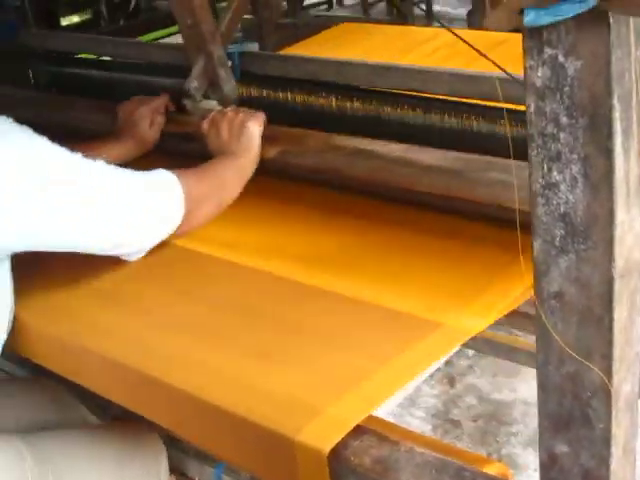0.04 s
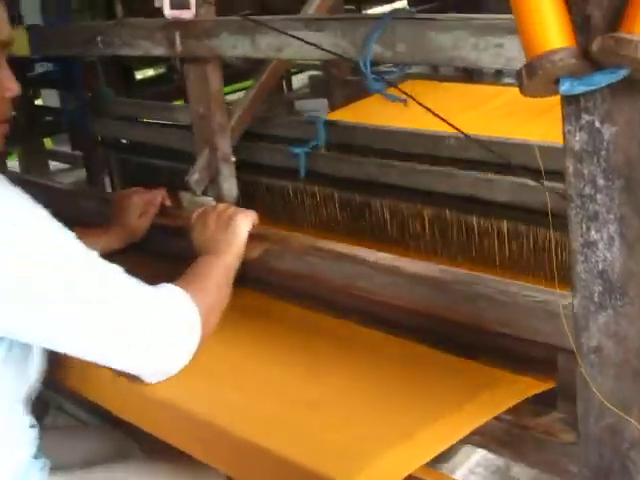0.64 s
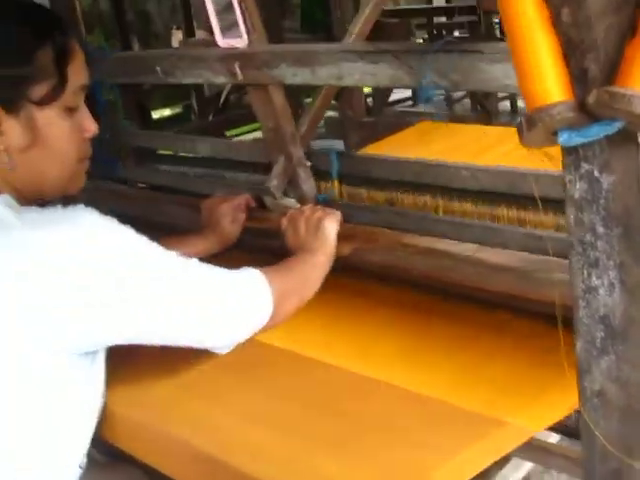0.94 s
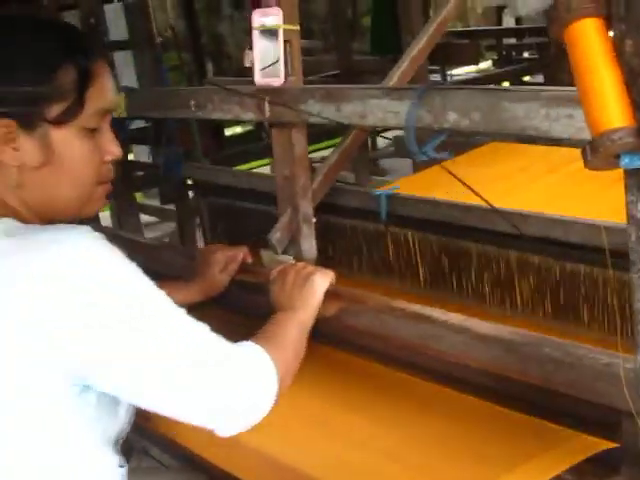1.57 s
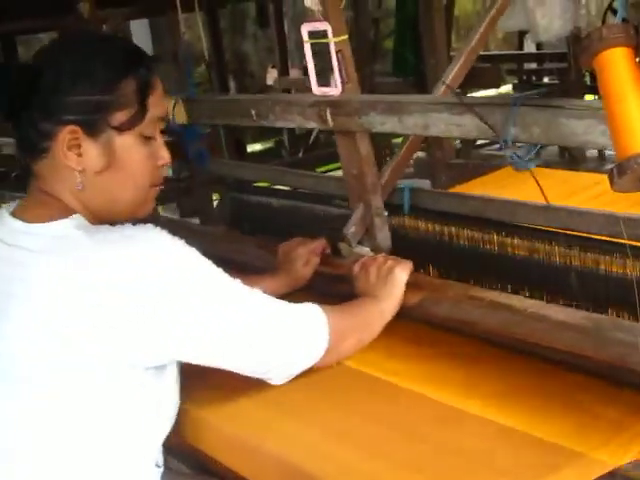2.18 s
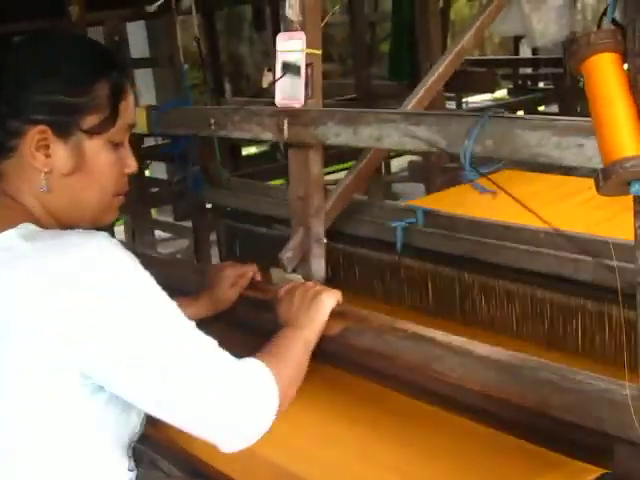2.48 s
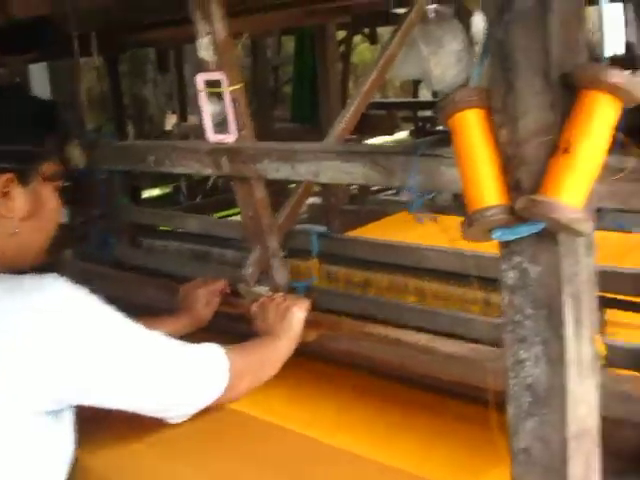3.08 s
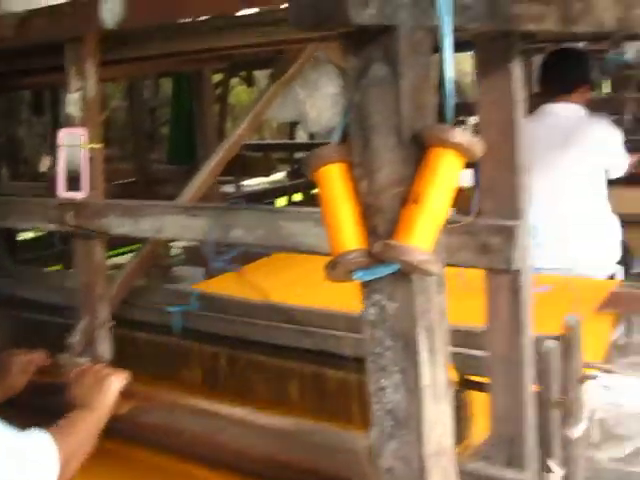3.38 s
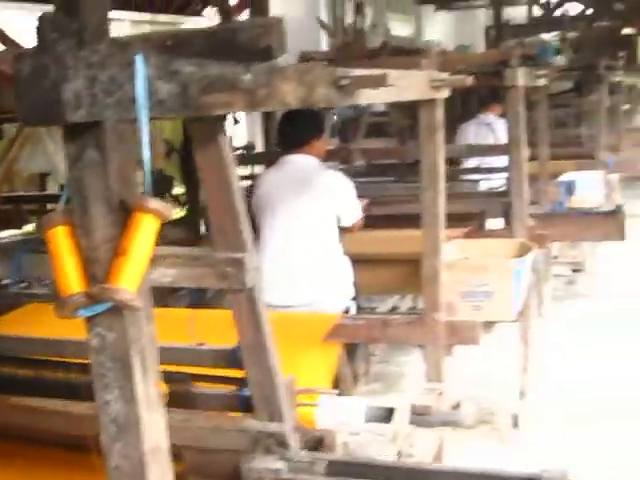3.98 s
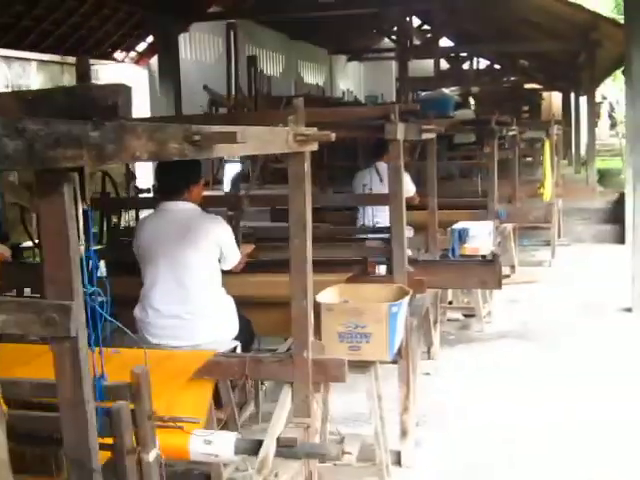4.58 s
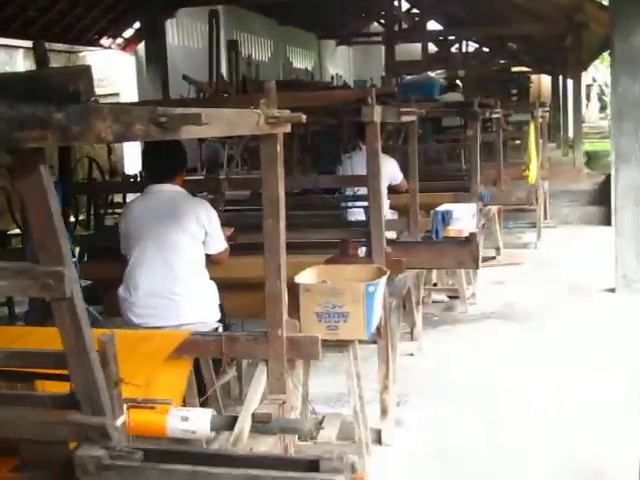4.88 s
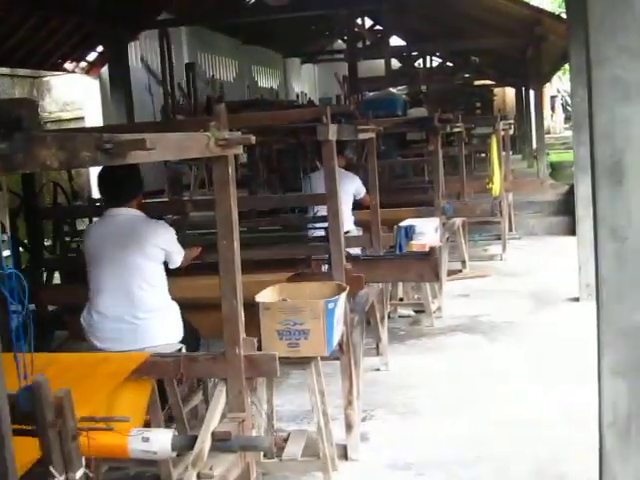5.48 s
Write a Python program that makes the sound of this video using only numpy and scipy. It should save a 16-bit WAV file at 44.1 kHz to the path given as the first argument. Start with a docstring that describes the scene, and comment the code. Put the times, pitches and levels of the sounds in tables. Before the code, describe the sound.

Sharp shuttle cracks alternate with wooden thuds on a hand weaving loom, rattling steadily, with more looms echoing nearby.

```python
"""A wooden handloom works close by in an open workshop, about one beat a second.
First the shuttle cracks into its box and the loom recoils; next the heddles change over, treadles clack.
Then the batten swings, the picker stick jerks, the batten beats the weft home, and the cycle repeats.
Each push sets the loom rattling. Throughout, other looms clatter and echo under the same roof;
the right microphone is faint and dull, with a low rumble."""
import sys
import numpy as np
from scipy import signal
from scipy.fft import rfft, irfft
from scipy.io import wavfile
from scipy.ndimage import uniform_filter1d

SR = 44100
rng = np.random.default_rng(int(sys.argv[2]) if len(sys.argv) > 2 else 0)


def file_out(sig):
    """Save sig as 16-bit WAV at sys.argv[1]."""
    # one column per channel
    cols = np.atleast_2d(sig).T
    # limit, then scale
    lim = np.clip(cols, -1, 1)
    pcm = np.round(lim * 32767).astype(np.int16)
    wavfile.write(sys.argv[1], SR, pcm)


N = 248724

# shuttle landings: start_s, relative_db, cutoff_hz, t60_s, relative_ring_db
SHUTTLE_HITS = [(0.2595, -15.5, 6300, 0.042, -8), (0.2661, -13.5, 4600, 0.13, -1.5),
                (1.2283, -18.5, 5030, 0.11, -1.5), (1.249, -21.5, 5500, 0.22, 3.5),
                (2.2393, -16, 7900, 0.095, 1.5), (2.2469, -8, 4500, 0.026, -1),
                (3.2053, -8.5, 12500, 0.019, 1.5), (4.1864, -14, 4700, 0.13, -16),
                (4.1917, -18.5, 4200, 0.01, 5.5), (5.149, -10.5, 5400, 0.084, -0.5)]
# modes of the shuttle's body: pitch_hz, relative_db, t60_s
SHUTTLE_RING = [(1590, -8, 0.14), (2086, -8, 0.15), (2670, -11, 0.21), (2587, 4.5, 0.022),
                (3080, 2.5, 0.093), (3680, -1, 0.078), (4045, 7, 0.018), (3900, 7, 0.049),
                (4550, 0.5, 0.026), (5430, 12.5, 0.019), (5860, -2, 0.042), (6800, -5, 0.036)]
# spectrum of the shuttle box: frequency_hz, gain_db
BOX_SPECTRUM = [(100, -33), (300, -16), (700, -6), (1500, -4.5), (2200, 0.5), (3200, -3.5), (3900, 2),
                (5400, -1.5), (7000, -2.5), (10000, -7.5), (16000, -60)]
def shuttle():
    """Impact excites free vibration: the box cracks and the shuttle's hard body rings briefly."""
    out, t = np.zeros((2, N)), np.arange(12000) / SR
    for start_s, db, cutoff_hz, t60, ring_db in SHUTTLE_HITS:
        # a softer contact lasts longer and loses its treble
        soften = lambda hz: -10 * np.log10(1 + (hz / cutoff_hz) ** 8)
        crack = blow(t60, lambda hz: read(BOX_SPECTRUM, hz) + soften(hz))
        ring = 0
        for hz, mode_db, mode_t60 in SHUTTLE_RING:
            decay = amp(mode_db - rng.uniform(-0.69, 1) + soften(hz) - 60 * t / mode_t60)
            ring += decay * np.sin(2 * np.pi * (hz * rng.uniform(0.92, 1.005) * t + rng.random((2, 1))))
        onset = 1 - np.exp(-t / 0.0001)
        add(out, start_s, amp(db) * (amp(-1) * crack + amp(ring_db - 6) * ring * onset))
    return out


# beats on the weft: start_s, relative_thud_db, thud_t60_s, relative_snap_db, snap_t60_s
BATTEN_BEATS = [(0.957, -15, 0.19, -7.5, 0.021), (1.9457, -10.5, 0.23, -39, .04),
                (2.9305, -13, 0.1, -7.5, 0.017), (3.8998, -10.5, 0.32, -30, 0.029),
                (4.8755, -17, 0.16, -3.5, 0.02)]
# spectra of the beam and the reed: frequency_hz, gain_db
BEAM_SPECTRUM = [(80, -66), (240, -15), (550, -12.5), (850, 2), (1250, -1), (1600, -4.5), (2300, -3.5),
                 (3400, -7), (5000, -12.5), (8000, -22), (15000, -55)]
REED_SPECTRUM = [(500, -14), (2000, -30), (3800, -3), (5000, 3), (6000, 4.5), (6900, -1.5), (8300, -3),
                 (10000, -11.5), (15000, -27)]
def batten():
    """One impact drives two damped bodies: the heavy beam thuds as the reed snaps against the cloth."""
    out = np.zeros((2, N))
    for start_s, thud_db, thud_t60, snap_db, snap_t60 in BATTEN_BEATS:
        thud = blow(thud_t60, lambda hz: read(BEAM_SPECTRUM, hz), contact=1, contact_s=0.01)
        snap = blow(snap_t60, lambda hz: read(REED_SPECTRUM, hz))
        add(out, start_s, amp(thud_db) * thud + amp(snap_db) * snap)
    return out


# treadles, heddle frames and levers meeting, plus the ringing ends of a picker jerk (2.83 s) and a shuttle
# landing (5.166 s): start_s, relative_db, pitch_hz, t60_s
LEVER_CLACKS = [(0., -22.5, 2270, 0.43), (.1954, -31, 2700, 0.23), (.335, -17, 5500, 0.031),
                (.356, -23, 2760, 0.051), (.4841, -25.5, 5130, 0.14), (.5262, -20, 4670, .027),
                (.913, -24, 2190, .18), (1.309, -21, 3860, 0.12), (1.7483, -33, 1600, 0.043),
                (1.909, -17, 3500, 0.027), (2.159, -26, 4340, 0.024), (2.3013, -14, 5200, 0.041),
                (2.4766, -16, 4600, 0.028), (2.5152, -16, 3700, 0.013), (2.7644, -33.5, 3400, 0.059),
                (2.83, -20, 2700, 0.063), (2.8815, -27.5, 2400, 0.24), (3.045, -26.5, 3540, 0.51),
                (3.465, -33.5, 5500, 0.21), (3.7468, -23, 4000, 0.026), (3.8675, -16, 4300, 0.017),
                (4.2529, -18, 5100, 0.088), (4.272, -21.5, 6640, 0.072), (4.3934, -25, 6310, 0.079),
                (4.4215, -20.5, 4450, 0.039), (4.8327, -33, 2440, 0.16), (5.166, -20, 2980, 0.4),
                (5.3815, -28, 5550, 0.093), (5.5761, -28.5, 2800, 0.39)]
# jerks of the picker stick that throws the shuttle: start_s, relative_db, pitch_hz, t60_s
PICKER_JERKS = [(.8425, -20.5, 2570, 0.14), (1.8976, -14.5, 2840, 0.067), (2.819, -18, 2670, 0.13),
                (3.7875, -19.5, 2620, 0.13), (3.8536, -17.5, 3260, 0.047), (4.0936, -18, 2890, 0.25),
                (4.2412, -17, 3200, 0.057), (4.7655, -20.5, 2840, 0.19)]
# spectrum of the wooden parts: frequency_hz, gain_db
WOOD_SPECTRUM = [(80, -12), (190, 1), (245, 13.5), (300, -5), (370, 9), (500, 8), (900, 17), (1700, 7.5),
                 (3000, 4), (5000, 1), (8000, -6), (10000, -14), (15000, -28)]
def clacks(rows, focus, skirt_db, peak_db, width_hz=90):
    """Resonance of colliding wood: a broad hump, higher for small parts, with a narrow peak or dip."""
    out = np.zeros((2, N))
    for start_s, db, pitch_hz, t60 in rows:
        def spectrum_db(hz):
            hump = 1 / (1 + (focus * np.log2((hz + 1) / pitch_hz)) ** 2)
            centre_db = peak_db / (1 + ((hz - pitch_hz) / width_hz) ** 2)
            return read(WOOD_SPECTRUM, hz) + 20 * np.log10(amp(skirt_db) + hump) + centre_db
        add(out, start_s, amp(db) * blow(t60, spectrum_db))
    return out


def loose_parts(shake, count=60, t60=0.057):
    """Vibration makes loose parts collide: rows of random clacks, as strong as the shaking."""
    moments = (np.arange(count) + rng.random(count)) * (N - 1) / count
    shake_db = 20 * np.log10(shake + 1e-6)
    return [(at / SR, shake_db[int(at)] + 9 + 2 * force, 4000 * 2 ** (0.96 * smallness), t60)
            for at, (force, smallness) in zip(moments, rng.uniform(-1, 1, (count, 2)))]


# single knocks of loom frames: start_s, relative_db
FRAME_KNOCKS = [(.074, -31), (1.231, -25.5), (1.602, -22), (1.749, -26.5), (2.513, -27), (2.884, -20),
                (2.913, -20), (3.114, -21), (3.71, -25), (3.857, -30), (4.64, -27), (4.852, -17),
                (5.555, -25), (5.576, -20)]
# modes of a frame: pitch_hz, relative_db, t60_s
FRAME_RING = [(925, -3.5, 0.44), (979, 5, 0.059), (1099, 1, 0.23), (1120, -23, 0.026), (1286, -1, 0.11),
              (1274, -7, 0.059)]
# spectrum of a frame: frequency_hz, gain_db
FRAME_SPECTRUM = [(100, -27), (200, -22.5), (243, -10), (300, -14), (390, -16), (600, -15), (800, -3),
                  (1000, -2), (1220, -6), (1550, -8.5), (2500, -14), (6000, -27), (15000, -79)]
def knocks(rows, detune=0.029):
    """Beating of close modes: in a heavy frame's hollow knock they start in step, then drift apart."""
    out, t = np.zeros((2, N)), np.arange(8000) / SR
    onset = 1 - np.exp(-t / 0.00078)
    for start_s, db in rows:
        ring = 0
        for hz, mode_db, t60 in FRAME_RING:
            detuned_hz = hz * (1 + detune * rng.uniform(-1.36, 1, (2, 1)))
            ring += amp(mode_db - 60 * t / t60) * np.sin(2 * np.pi * detuned_hz * t)
        thud = blow(0.14, lambda hz: read(FRAME_SPECTRUM, hz), size=len(t))
        add(out, start_s, amp(db) * (amp(-8) * thud + amp(-9) * ring * onset))
    return out


# pushes as the batten swings, the loom recoils from the shuttle and the heddles change over:
# start_s, frame_db, heddles_db, threads_db
BATTEN_SWINGS = [(.805, -30.5, -34.5, -42), (1.828, -28, -33.5, -59), (2.82, -32, -39.5, -57),
                 (3.787, -30, -34, -58), (4.766, -33, -35.5, -61)]
LOOM_RECOILS = [(0.326, -29.5, -35.5, -53), (1.32, -28.5, -33, -51), (2.2916, -25, -32, -40),
                (3.289, -32, -38, -50), (4.251, -29, -35.5, -46), (5.223, -28.5, -36, -45)]
SHED_CHANGES = [(.46, -58, -58, -66), (1.48, -30.5, -58, -51), (2.46, -29, -40, -67),
                (3.455, -33, -43, -54), (4.5, -58, -34.5, -49), (5.375, -30.5, -41.5, -43.5)]
def shaking():
    """Incoherent vibrations add in power: amplitudes of frame, heddles and threads after each push."""
    after_beats = [(start_s, -37.5, -39, -46.5) for start_s, *_ in BATTEN_BEATS]
    return np.sqrt(pushes(BATTEN_SWINGS, rise_s=0.0067, hold_s=0.14, fall_db_per_s=74)
                   + pushes(after_beats, rise_s=0.02, hold_s=0.05, fall_db_per_s=48)
                   + pushes(LOOM_RECOILS, rise_s=0.0029, hold_s=0.028, fall_db_per_s=60)
                   + pushes(SHED_CHANGES, rise_s=0.004, hold_s=0.087, fall_db_per_s=110))


def pushes(rows, rise_s, hold_s, fall_db_per_s):
    """Damped vibration: the power of each push rises, holds and decays exponentially."""
    power = np.zeros((3, N))
    for start_s, *parts_db in rows:
        t = np.arange(N) / SR - start_s
        envelope = np.clip(t / rise_s, 0, 1) * amp(-fall_db_per_s * np.maximum(t - rise_s - hold_s, 0))
        power += np.outer(amp(parts_db), envelope) ** 2
    return power


def bounces(count=3, gap_s=0.022, loss_db=6):
    """Inelastic rebound: rows of knocks for each recoil, unevenly spaced and ever weaker."""
    slips = rng.uniform(-0.2, 0.194, (len(LOOM_RECOILS), count))
    return [(start_s + gap_s * k * (1 + slip[k]), frame_db + 9.5 - loss_db * k)
            for (start_s, frame_db, _, _), slip in zip(LOOM_RECOILS, slips) for k in range(count)]


# spectra of rattling heddles and rasping threads: frequency_hz, gain_db
HEDDLE_SPECTRUM = [(100, -37), (190, -0.5), (245, -14), (300, 0.5), (600, -9), (1800, 5.5), (3000, 4.5),
                   (4500, -2), (6300, -8), (8000, -15.5), (10000, -30.5), (15000, -43)]
THREAD_SPECTRUM = [(500, -26), (2000, -4), (4500, 4), (7000, 1), (9500, -4), (12000, -21), (15000, -20.5)]
def rattle(spectrum, taps_per_s, spread_db, t60, parts=24):
    """Superposition of random impacts: many small parts tap, each with its own ring."""
    out = np.zeros((2, N))
    for _ in range(parts):
        taps = rng.random(N) < taps_per_s / parts / SR
        force = amp(spread_db * np.minimum(rng.exponential(1, N), 3))
        ring = blow(t60, lambda hz: read(spectrum, hz), size=4000)
        out += signal.oaconvolve((taps * force)[None], ring, axes=1)[:, :N]
    # even out the energy over each tenth of a second
    return out / np.sqrt(uniform_filter1d((out ** 2).mean(0), size=4400) + 1e-6)


# clatter of the other looms, louder as the microphone turns to them: time_s, level_db
NEIGHBOUR_LEVELS = [(0, -55), (.25, -33.5), (.65, -42), (1.2, -36), (1.7, -44), (2.75, -61), (3.3, -37),
                    (3.68, -42.5), (4.2, -40.5), (4.7, -33), (5.07, -42.5), (5.64, -48)]
def frame_clatter(near_level):
    """Independent sources add in power: this loom's frame rattles along with the other looms."""
    others_level = amp(np.interp(np.arange(N) / SR, *np.transpose(NEIGHBOUR_LEVELS)))
    return np.hypot(near_level, others_level) * rattle(FRAME_SPECTRUM, 320, spread_db=2.5, t60=0.13)


# treadle strokes: start_s, relative_db
TREADLE_STROKES = [(1.743, -40.5), (1.942, -42), (2.591, -43), (2.882, -42), (3.066, -42), (3.744, -39)]
# spectrum of their thump: frequency_hz, gain_db
THUMP_SPECTRUM = [(20, -28), (50, 1), (90, -7), (150, 9.5), (260, -16), (600, -32), (2000, -84)]
def thumps(t60=0.13):
    """Structure-borne sound: treadles push a low thump through the loom and floor."""
    out = np.zeros((2, N))
    for start_s, db in TREADLE_STROKES:
        add(out, start_s, amp(db) * blow(t60, lambda hz: read(THUMP_SPECTRUM, hz), size=8000))
    return out


# reverberation time of the workshop: frequency_hz, t60_s
WORKSHOP_DECAY = [(200, 0.37), (900, 0.5), (2000, 0.76), (5000, 0.35), (9000, 0.35), (15000, 0.096)]
def room(x, size=256):
    """Diffuse reverberation from looms, floor and roof: each band stores energy and lets it go."""
    hz, t, bands = signal.stft(x[0], SR, nperseg=size)
    retained = amp(-60 * t[1] / read(WORKSHOP_DECAY, hz)) ** 2
    power = uniform_filter1d(abs(bands) ** 2, size=3, axis=0)
    stored = np.array([signal.lfilter([0, 1 - k], [1, -k], band) for k, band in zip(retained, power)])
    scatter = signal.stft(rng.standard_normal((2, N)), SR, nperseg=size)[2]
    echoes = np.sqrt(abs(stored) / np.mean(abs(scatter) ** 2)) * scatter
    return signal.istft(echoes, SR, nperseg=size)[1][:, :N]


# spectrum of the workshop's background: frequency_hz, gain_db
SHOP_SPECTRUM = [(30, -31), (120, -8), (240, -3.5), (500, -2), (1000, 0), (1700, -8), (4000, -15.5),
                 (7000, -23), (10000, -33), (16000, -46)]
def air(spectrum):
    """Spectral shaping of white noise gives a steady background."""
    gain = amp(read(spectrum, np.fft.rfftfreq(N, 1 / SR)))
    return unit(irfft(rfft(rng.standard_normal((2, N))) * gain, N))


# spectrum of the low rumble: frequency_hz, gain_db
RUMBLE_SPECTRUM = [(15, -1), (45, 4), (80, 2.5), (130, -7), (220, -12.5), (500, -5.5), (2000, -38),
                   (8000, -93)]
def rumble(wander_db=4.4):
    """Slow amplitude modulation makes a low noise waver, mostly on the right."""
    t = np.arange(N) / SR
    wander = unit(sum(np.sin(2 * np.pi * (hz * t + rng.random())) for hz in np.geomspace(0.794, 9, 24)))
    return amp([[-72], [-51]]) * amp(wander_db * wander) * air(RUMBLE_SPECTRUM)


def blow(t60, db_of, size=12000, contact=0.67, contact_s=0.0012, uneven_db=3):
    """Impulse response of a struck part: a hard contact, then dense, uneven modes that die together."""
    t = np.arange(size) / SR
    fade = amp(-60 * t / t60) * (1 + contact * np.exp(-t / contact_s))
    grid_hz = np.arange(0, SR / 2, 130)
    strength_db = uneven_db * np.clip(rng.standard_normal(len(grid_hz)), -2, 2)
    burst = rng.choice([-1., 1.], (2, size)) * fade
    return colour(burst, lambda hz: db_of(hz) + np.interp(hz, grid_hz, strength_db))


def colour(x, db_of, size=2048):
    """Minimum-phase filter of energy 1, shaped like db_of(hz)."""
    hz = abs(np.fft.fftfreq(size, 1 / SR))
    log_gain = np.log(amp(np.maximum(db_of(hz), -100)))
    taps = np.fft.ifft(np.exp(np.conj(signal.hilbert(log_gain)))).real[:size // 2]
    return signal.oaconvolve(x, taps[None] / np.linalg.norm(taps), axes=1)[:, :x.shape[1]]


def amp(db):
    """Decibels to gain."""
    return 10 ** (np.asarray(db) / 20)


def unit(x):
    """Scales to rms 1."""
    return x / np.sqrt(np.mean(x ** 2) + 1e-20)


def read(points, hz):
    """Interpolation on a log-frequency axis."""
    frequency_hz, value = np.transpose(points)
    return np.interp(np.log(hz + 1), np.log(frequency_hz), value)


def add(mix, start_s, sound):
    """Superposition: a two-channel sound joins the mix at start_s."""
    part = mix[:, max(round(start_s * SR), 0):][:, :sound.shape[1]]
    part += sound[:, :part.shape[1]]


def scene():
    """Direct sound and reverberant field add: the looms' blows and rattles in the workshop."""
    frame_level, heddle_level, thread_level = shaking()
    clatter = frame_clatter(frame_level)
    heddles = heddle_level * rattle(HEDDLE_SPECTRUM, taps_per_s=350, spread_db=1, t60=0.08)
    rasp = thread_level * rattle(THREAD_SPECTRUM, taps_per_s=700, spread_db=-0.5, t60=0.012, parts=6)
    cracks = amp(-2.5) * shuttle()
    beats = amp(-4.5) * batten()
    frames = knocks(FRAME_KNOCKS + bounces())
    wood = amp(-0.5) * clacks(LEVER_CLACKS + loose_parts(heddle_level), 0.8, skirt_db=-35, peak_db=-3.5)
    throws = amp(-1.5) * clacks(PICKER_JERKS, focus=1.86, skirt_db=-16.5, peak_db=5.5)
    # the shuttle box is nearest, so its cracks carry little echo
    echoes = room(amp(-11) * cracks + amp(-12) * beats + amp(-6.5) * wood + amp(-7.5) * throws
                  + 0.5 * frames + amp(-8.5) * heddles)
    direct = cracks + beats + wood + throws + frames + clatter + heddles + rasp + amp(-2) * thumps()
    return direct + echoes + amp(-42.5) * air(SHOP_SPECTRUM)


def gain_control(x, threshold_db=-20, share=0.43, attack_s=0.029, recover_db_per_s=7):
    """Compression: the gain drops after the sharpest cracks and recovers slowly."""
    slope_power = uniform_filter1d(np.diff(x[0], prepend=0) ** 2, size=200)
    edge_db = 10 * np.log10(abs(slope_power) + 1e-12)
    recovery_db = recover_db_per_s * np.arange(N) / SR
    held_db = np.maximum.accumulate(edge_db + recovery_db) - recovery_db
    over_db = np.maximum(held_db - threshold_db, 0)
    pole = np.exp(-1 / (attack_s * SR))
    return x * amp(-share * signal.lfilter([1 - pole], [1, -pole], over_db))


# response of the right microphone relative to the left: frequency_hz, gain_db
RIGHT_RESPONSE = [(60, 8.5), (150, -2), (260, -13), (400, -38), (500, -6), (630, -17), (800, -20.5),
                  (1100, -5), (1500, -12), (2000, -19), (2900, -23), (3800, -14.5), (5000, -25),
                  (8000, -30), (12000, -41)]
# likeness of the two channels: frequency_hz, coherence_ratio
COHERENCE = [(300, 0.089), (680, 0.63), (780, 0.21), (1350, 0.71), (2000, 0.17), (3000, 0.52), (9000, .25)]
# phase delay of the right channel: frequency_hz, lag_rad
RIGHT_LAG = [(300, -1.65), (980, -0.71), (1200, 0.027), (1550, 1.8), (3500, 1.77)]
# treble response of both channels: frequency_hz, gain_db
TREBLE_RESPONSE = [(10300, 0.5), (11200, -12.5), (11600, -10), (12300, 2.5), (15500, 5)]
def record(dry, cutoff_hz=15900):
    """Partial coherence: a clear left and a muffled right microphone, compressed and band-limited."""
    hz = np.fft.rfftfreq(N + SR, 1 / SR)
    left, other = rfft(dry, N + SR)
    coherence = np.clip(read(COHERENCE, hz), 0, 1)
    shared = coherence * np.exp(-1j * read(RIGHT_LAG, hz)) * left
    right = amp(read(RIGHT_RESPONSE, hz)) * (shared + np.sqrt(1 - coherence ** 2) * other)
    pair = irfft(np.array([left, right]) * amp(read(TREBLE_RESPONSE, hz)), N + SR)[:, :N]
    pair = np.clip(gain_control(pair + rumble()), -1, 1)
    lowpass = signal.firwin(255, cutoff_hz, window=("kaiser", 8), fs=SR)
    return signal.oaconvolve(pair, lowpass[None], "same")


dry = scene()
out = record(dry)
file_out(out)
```